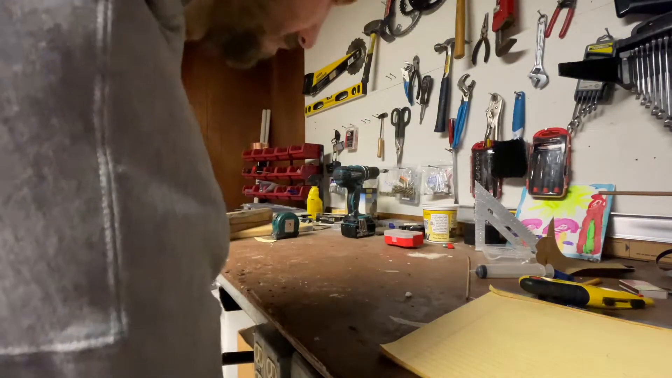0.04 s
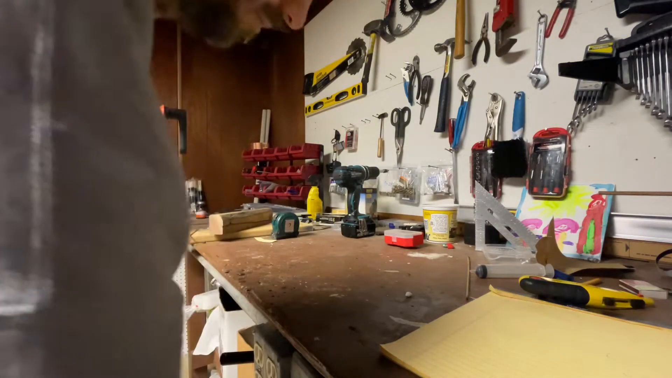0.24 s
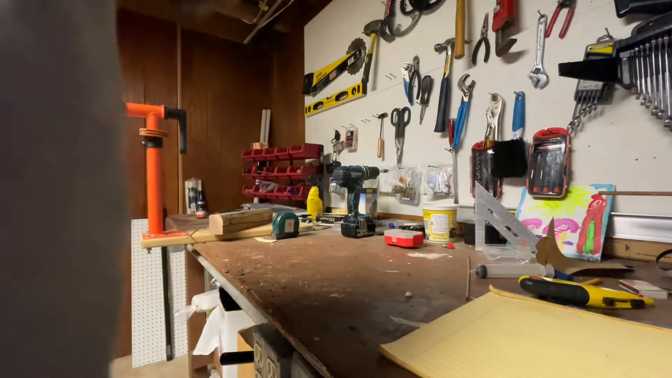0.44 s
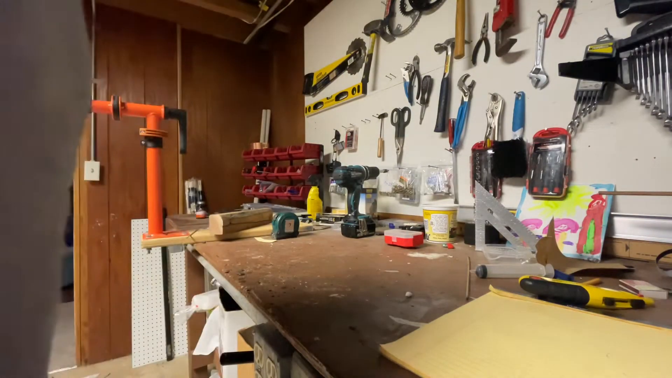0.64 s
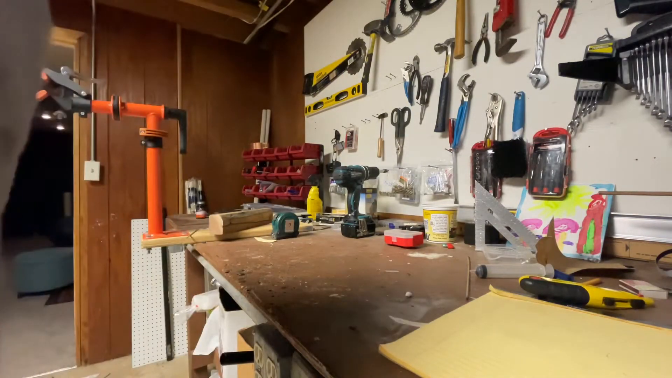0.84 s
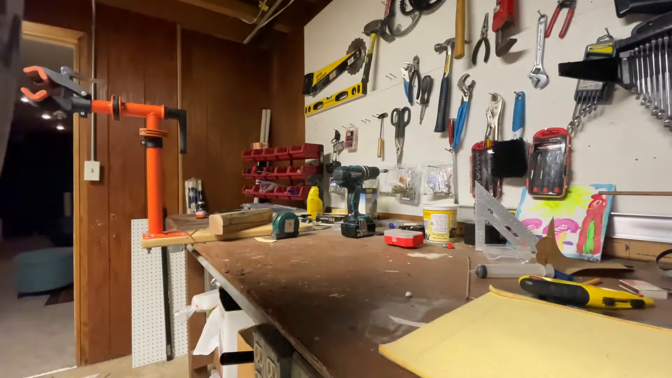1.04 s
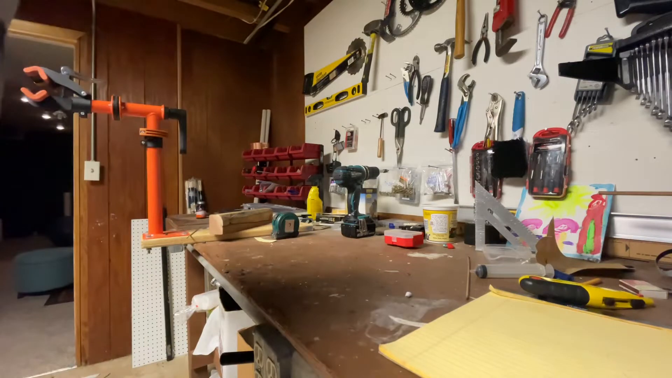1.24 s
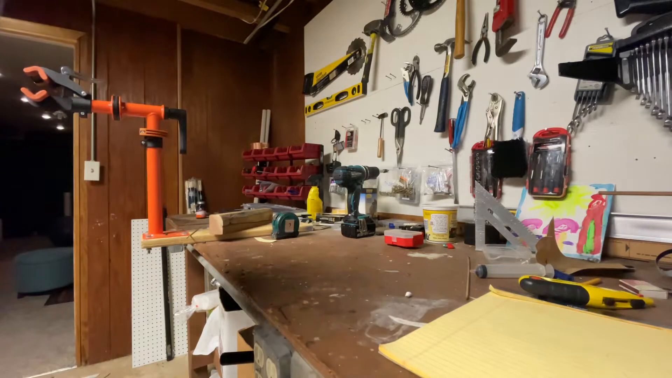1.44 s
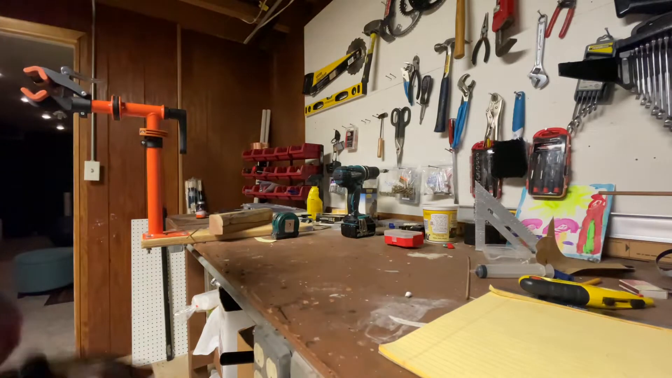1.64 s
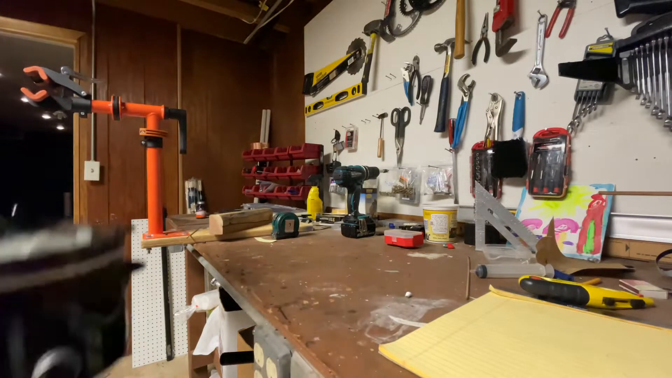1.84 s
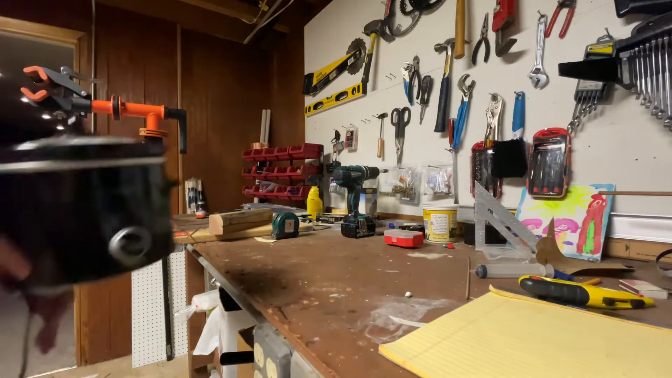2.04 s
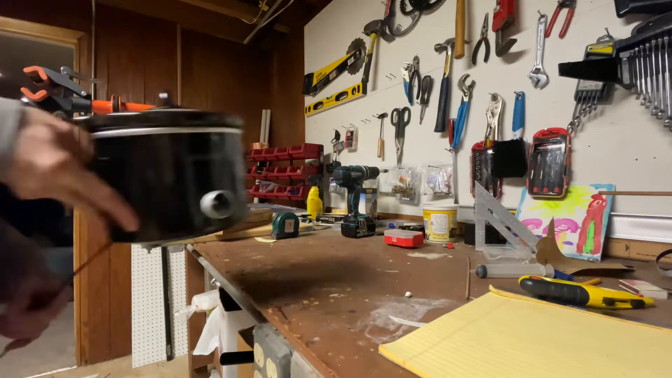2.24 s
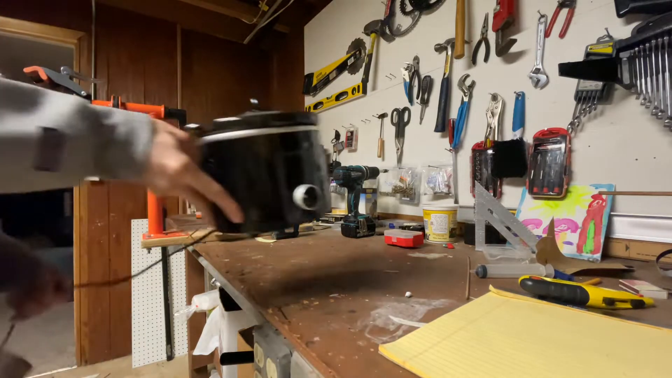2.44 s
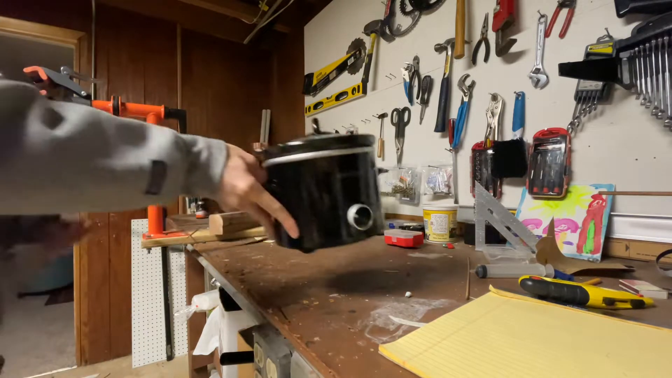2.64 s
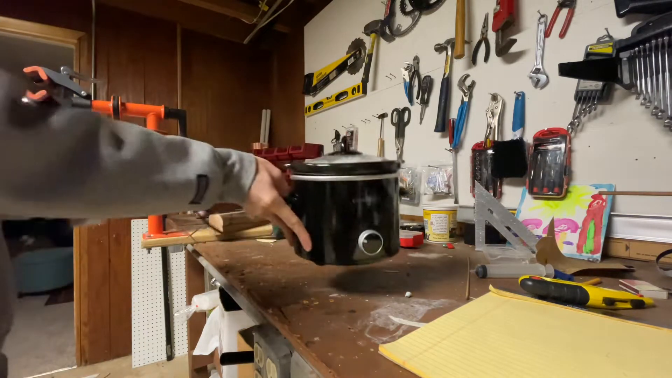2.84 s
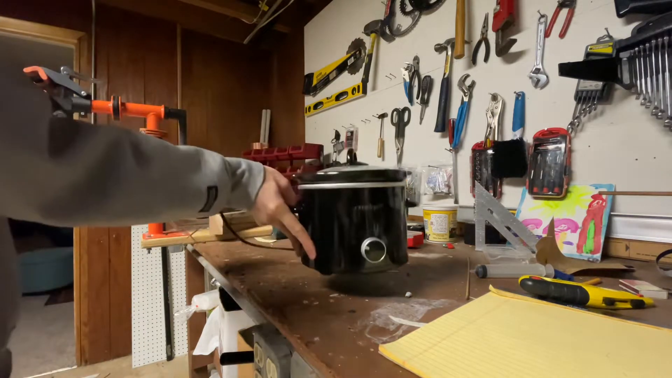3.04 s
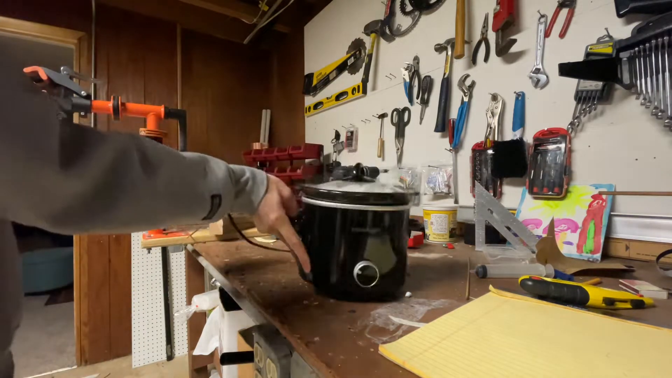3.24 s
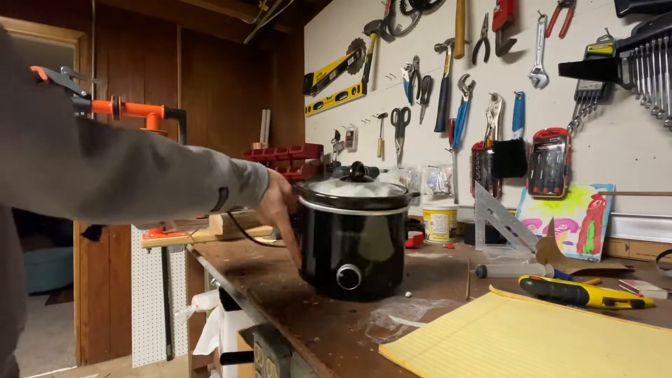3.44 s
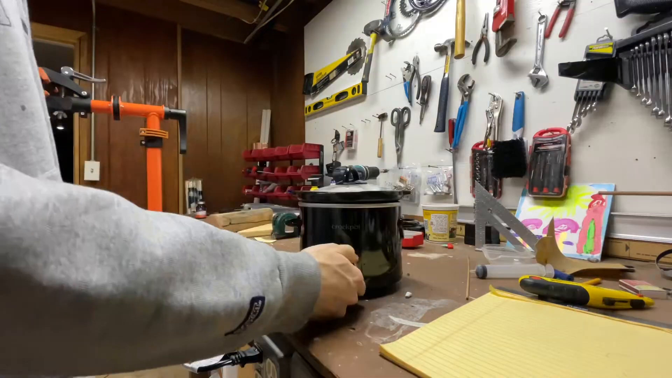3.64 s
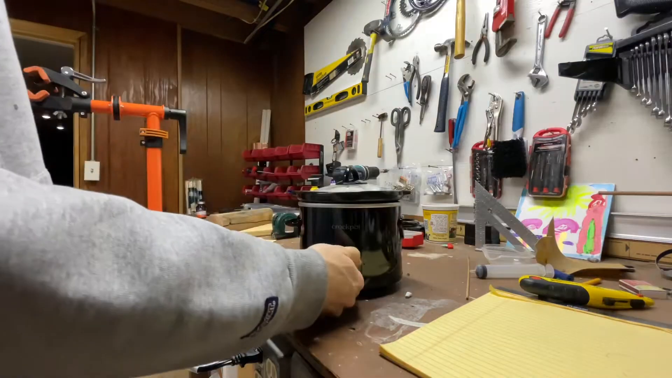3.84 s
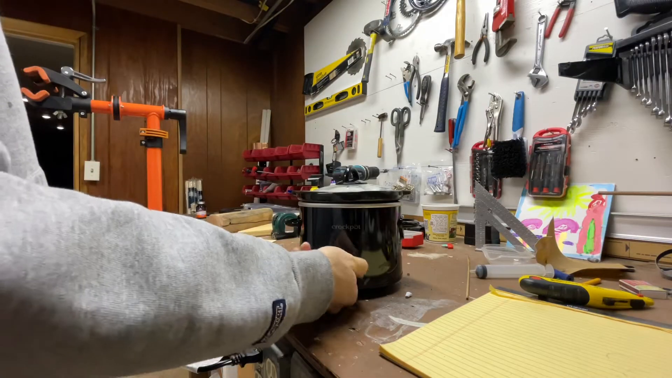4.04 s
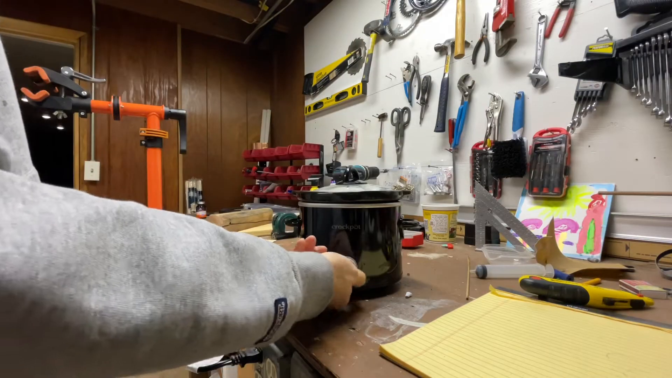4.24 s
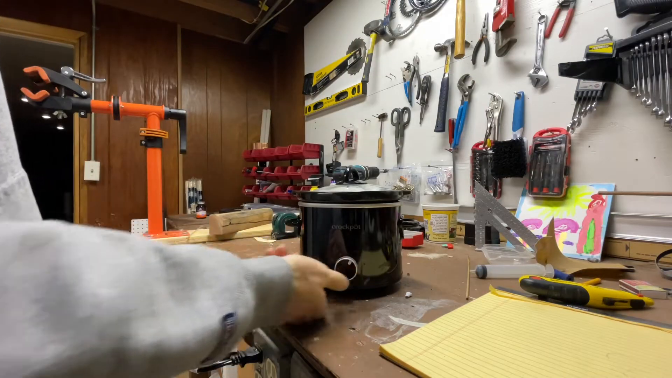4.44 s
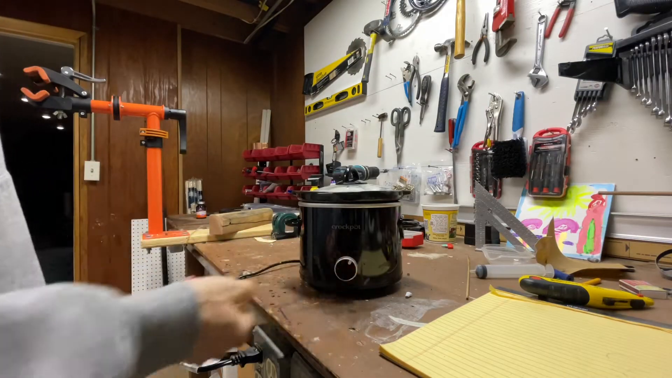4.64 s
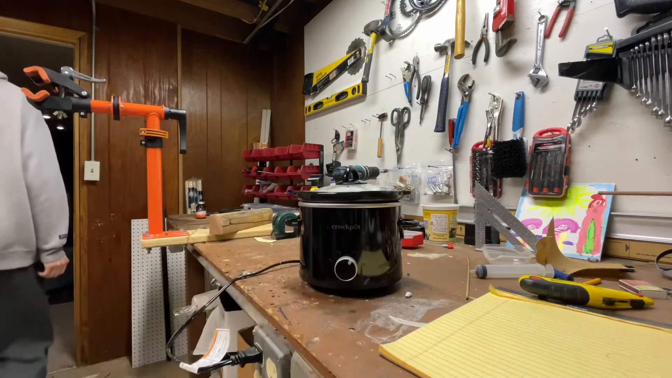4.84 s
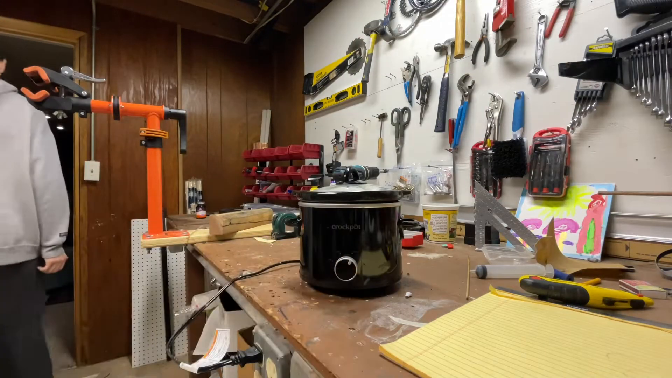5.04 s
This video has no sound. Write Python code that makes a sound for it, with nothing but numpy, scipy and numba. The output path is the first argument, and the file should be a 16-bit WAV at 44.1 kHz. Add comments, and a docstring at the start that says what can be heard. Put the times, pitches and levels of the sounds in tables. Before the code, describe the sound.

Light knocks and sleeve rustle, then a small cooker lands heavily on a wooden bench, followed by a sharp knob click.

```python
"""A workshop on a stereo microphone, a low room rumble throughout. In the first second a small slow
cooker knocks and clinks as it is lifted off a shelf; sleeves and cord rustle as it is carried in.
At 3.2 s its feet land one after another on a wooden workbench: the bench heaves, the lid rattles,
the pot judders to rest. The level dips briefly, the knob clicks round at 3.7 s, and a few ticks
and rubs follow, with a second dip at 4.7 s."""
import sys
import numpy as np
from scipy import signal
from scipy.fft import rfft, irfft, next_fast_len
from scipy.io import wavfile
from scipy.ndimage import uniform_filter1d
from numba import njit

SR = 44100
rng = np.random.default_rng(int(sys.argv[2]) if len(sys.argv) > 2 else 0)


def log_audio(samples):
    """Write samples as a 16-bit WAV file to the path given in sys.argv[1]."""
    # one column per channel
    frames = np.atleast_2d(samples).T
    # limit to full scale, then quantise
    limited = np.clip(frames, -1, 1)
    pcm = np.round(limited * 32767).astype(np.int16)
    wavfile.write(sys.argv[1], SR, pcm)


N = 225116

# how alike the room sounds on the two sides of the microphone: f/Hz, correlation
ROOM_LIKENESS = [(60, 0.77), (130, 0.69), (290, 0.49), (640, 0.017), (15000, 0.037)]


def feet_landing():
    """The feet hit the bench one after another and ring the pot."""
    # landings: t/s, level/dB, contact/ms, crack/dB, left minus right/dB, spot/quarter turns
    landings = [(3.2265, -23.5, 0.43, -23, 0, .2), (3.229, -11.5, 0.43, -29.5, 0, .1),
                (3.236, -17, 0.5, -24.5, 0.5, 0.75), (3.281, -16, 0.38, -26, -8, 1),
                (3.312, -27, 1., -29, -0.5, 0.71), (3.3405, -15.5, 0.5, -27, -2, 0.087),
                (3.365, -25, 0.53, -19, -4.5, 0.73)]
    # pot modes: f/Hz, level/dB, t60/s, left minus right/dB, antinode/quarter turns
    pot_modes = [(197, -3.5, 0.15, 0.72, 0.83), (285.4, -1.5, 0.084, 0.99, 0.12),
                 (352, -0.5, 0.064, 0.9, 1), (478, -1, 0.057, 0.89, 1), (575, 4.5, 0.055, 0.93, 0.048),
                 (670, -6, 0.045, 0.96, 1), (707, -9.5, 0.064, 1, 0.21), (929, -3.5, 0.049, 0.87, .1),
                 (1181, -8, 0.064, 0.86, 0.22), (1364, -11, 0.047, 0.81, 0.456),
                 (1663, -13, 0.024, 0.93, 0.78)]
    return strike(landings, pot_modes, crack_hz=(200, 2630), crack_t60=.15,
                  chatter_ms=4.6, spread=0.023, uneven=0.92)


def bench_heaving():
    """The wood booms under the load; the pot settles in four soft, even pushes, each a little weaker."""
    # heaves: t/s, level/dB, contact/ms, crack/dB, left minus right/dB
    heaves = [(.07, -40.5, 2.2, -12, 2), (.19, -34, 4, -35, -6), (.214, -32.5, 2.8, -32.5, -2),
              (.77, -35, 4.3, -38, -7), (3.2358, -12, 3, -17.5, -10), (3.2505, -17, 3.9, -29.5, -2.5),
              (3.288, -17.5, 0.88, -29, -7), (3.306, -23, 1.9, -23, -5), (3.347, -15.5, 8.5, -21.5, -10),
              (3.3635, -19.5, 5.2, -20, -1.5)]
    # bench modes: f/Hz, level/dB, t60/s, left minus right/dB
    bench_modes = [(68, 7, 0.092, 1), (126.4, 5, 0.12, 1), (180.5, 1.5, 0.13, 0.93), (247, -6, 0.072, 0.89)]
    judder_s, judder_hz = 3.433, 63.4
    judder = [(judder_s + k / judder_hz, -30 - 2 * k, 9.4, -28, -1.8) for k in range(4)]
    return strike(heaves + judder, bench_modes, crack_hz=(100, 400), crack_t60=0.17,
                  chatter_ms=0.84, spread=0.0051, uneven=0.203)


def lid_rattling():
    """The jolted lid taps the pot: hard contacts, a short bright ring."""
    # taps: t/s, level/dB, contact/ms, crack/dB, left minus right/dB
    taps = [(3.2325, -32, 0.091, 3, -1.5), (3.2412, -32.5, 0.095, 3.3, 1.9), (3.2748, -35.5, 0.061, 3, 1.5),
            (3.344, -38, 0.0783, 3, 1.0), (3.3575, -39, 0.08, 3, -0.5), (3.3768, -25.5, 0.11, 0.98, 1.4),
            (3.3815, -29, 0.13, 2, 1.5), (3.3875, -40, .1, 2, 1.5)]
    # lid modes: f/Hz, level/dB, t60/s, left minus right/dB
    lid_modes = [(2240, -7, 0.017, 0.0031), (3130, 2, 0.013, 0), (3950, 0, 0.021, 0.0073),
                 (4880, -1.5, 0.0058, 0.004), (6730, 6, 0.0075, 0), (7200, 0, 0.011, 0.0079)]
    return strike(taps, lid_modes, crack_hz=(1200, 7300), crack_t60=0.036,
                  chatter_ms=1.4, spread=0.15, uneven=0.68)


def shelf_knocking():
    """The cooker bumps the shelf on its way off and metal clinks, mostly left of the microphone."""
    # blows: t/s, level/dB, contact/ms, crack/dB, left minus right/dB, spot/quarter turns
    knocks = [(.167, -31, 0.39, -44, -0.5, 0.16), (.176, -31.5, 1.7, -29, 6, 0.13),
              (.197, -34.5, 0.62, -11, 9, 0.091), (.22, -37, 0.82, -13, 7, .2),
              (.719, -35, 0.43, -13.5, 9, 0.98), (.722, -26.5, 1.8, -41, -8, 0.95),
              (.738, -30, 1.45, -25, 6, 0.43), (.787, -41.5, 0.42, -10, 7, 0.93),
              (.815, -44, 0.42, -7, 16, 1), (.868, -48, 0.25, -15, 11, 0.44),
              (.897, -32, 0.38, -13, 12.5, 0.29), (.902, -23.5, 0.31, -14.5, 3.5, 0.72),
              (.987, -34.5, 1.15, -28, 4, 0.83), (.997, -33.5, 1.3, -25, 2, 0.83)]
    clinks = [(0.7189, -47, 0.058, -5, 9.5, 0.37), (0.7867, -38.5, 0.035, -2, 7.3, 0.87),
              (0.8126, -49, 0.05, 1, 6.9, .6), (0.8957, -36, 0.026, -4, 9.1, .2),
              (0.9025, -38.5, 0.03, -5, 8.2, .3), (0.972, -45, 0.062, -2, 6.5, .5)]
    # modes: f/Hz, level/dB, t60/s, left minus right/dB, antinode/quarter turns
    shelf_modes = [(189, -3.5, 0.045, -0.5, 0.11), (251.5, -0.5, 0.096, -4.5, 0.9),
                   (299, -2.5, 0.092, 4.5, 1), (348, -0.5, 0.13, -4, 0.2), (477, -1.5, 0.071, -2.5, 1),
                   (621, -7, 0.079, 5.5, 0.48), (731, -7.5, 0.067, 13, 0.97), (954, -5.5, 0.028, 4, 0.55),
                   (1160, -4.5, 0.2, -2, 0.049), (1374, 2.5, 0.05, 4.5, 1), (1930, -2.5, 0.021, 4, 0.52),
                   (2480, -3.5, 0.031, 3, 1)]
    metal_modes = [(2610, -3, 0.03, 0, .3), (3330, -1, 0.027, 0, .6), (6160, 2, 0.09, 0, .1),
                   (7450, -3, 0.05, 0, .8), (10060, -0.5, 0.07, 0, 0.85)]
    shelf = strike(knocks, shelf_modes, crack_hz=(430, 5100), crack_t60=0.062,
                   chatter_ms=3.07, spread=0.028, uneven=0.78)
    metal = strike(clinks, metal_modes, crack_hz=(870, 12000), crack_t60=0.048,
                   chatter_ms=3.0, spread=0.0049, uneven=0.49)
    return shelf + metal


def knob_turning():
    """The knob snaps round in one tight cluster of ringing clicks."""
    # clicks: t/s, level/dB, contact/ms, crack/dB, left minus right/dB, spot/quarter turns
    clicks = [(3.7245, -42, 0.084, 0, 1, 0.107), (3.7295, -41.5, 0.64, -24.5, 1, .5),
              (3.7385, -30.5, 0.18, -13, 2.2, 0.046), (3.7402, -25, 0.14, -14, 1.8, 0.046),
              (3.747, -30.5, 0.77, -9, 1, 0.6), (3.754, -32, 0.51, -29, 1, 1)]
    # knob modes: f/Hz, level/dB, t60/s, left minus right/dB, antinode/quarter turns
    knob_modes = [(553, 1, 0.059, 1, 0.99), (749, 0.5, 0.2, 1, 0.37), (1006, -5, 0.076, 1, 0.94),
                  (1386, -0.5, 0.04, 1, 0.13), (1657, 1, 0.05, 1, .2), (2376, 2, 0.12, 1, .05),
                  (2630, 9.5, 0.018, 1, .05), (3060, -2, 0.025, 1, .1), (4450, 1, 0.057, 1, .1),
                  (6050, -1.5, 0.012, 1, .1)]
    return strike(clicks, knob_modes, crack_hz=(670, 4540), crack_t60=0.076,
                  chatter_ms=1.0, spread=0.011, uneven=0.78)


def small_ticks():
    """Faint, hard contacts that ring near 3 kHz."""
    # ticks: t/s, level/dB, contact/ms, crack/dB, left minus right/dB
    ticks = [(2.111, -61, 0.06, -5, 11), (2.675, -54.5, 0.073, -6, 8), (3.921, -51.5, 0.055, -13, 1),
             (3.9955, -41, 0.05, -19.5, 3), (4.09, -51, 0.06, -10, 3)]
    # modes: f/Hz, level/dB, t60/s, left minus right/dB
    tick_modes = [(2390, -10, .015, 1), (3096, 7, 0.031, 1), (3780, -6, 0.02, 1), (4480, -8, 0.022, 1)]
    return strike(ticks, tick_modes, crack_hz=(1800, 7200), crack_t60=0.061,
                  chatter_ms=0.51, spread=0.037, uneven=0.44)


def strike(blows, modes, crack_hz, crack_t60, chatter_ms, spread, uneven):
    """Each blow is a short chatter of half-sine pushes into the modes, with a crack of contact noise."""
    hz, db, t60, lean_db, *antinode = (column[:, None] for column in np.transpose(modes))
    out = np.zeros((2, N + SR))
    t = np.arange(int(SR * max(t60.max(), crack_t60) * 3 / 4)) / SR
    sign = -(-1.) ** np.arange(len(modes))  # neighbouring modes swing against each other
    side = np.array([[.5], [-.5]])
    chatter_fade = np.exp(-np.arange(1000) * 1000 / SR / chatter_ms)
    for s, level_db, contact_ms, crack_db, pan_db, *spot in blows:
        # an uneven body splits each mode into close partials that reach the two sides unequally
        split = 1 + spread * rng.standard_normal((4, len(modes), 1))
        ring = np.sin(2 * np.pi * hz * split * t) * np.exp(-np.log(1000) * t / t60)
        scatter = 1 + uneven * rng.standard_normal((4, 2, len(modes)))
        reach = scatter * sign * undb(db.T + side * lean_db.T)
        if spot:  # a mode struck near its node stays quiet
            reach *= 0.15 + np.abs(np.cos(np.pi / 2 * (spot[0] - antinode[0].T)))
        length = max(contact_ms * SR / 1000, 1.01)
        push = np.sin(np.pi * (np.arange(int(length) + 1) + .5).clip(0, length) / length)
        chatter = (rng.random(1000) < .04) * rng.random(1000) * chatter_fade
        chatter[0] = 1.24  # the first touch is the hardest
        force = np.convolve(push, chatter)
        body = signal.fftconvolve((reach @ ring).sum(axis=0), force[None])[:, :len(t)]
        noise = rng.standard_normal((3, len(t)))
        crack = band(noise[0] + 2.5 * noise[1:], *crack_hz) * np.clip(t / 0.00061, 0, 1)
        crack = crack / np.std(crack) * np.exp(-np.log(1000) * t / crack_t60)
        hit = body / np.abs(body).max(axis=1).mean() + undb(crack_db) * crack
        i = int(s * SR)
        out[:, i:i + len(t)] += hit * undb(level_db + side * pan_db) / np.hypot(1, 2 * undb(crack_db))
    return out[:, :N]


def rustle():
    """Swells of grainy noise, dull, bright and hollow; most are the rustle of sleeves and cord."""
    # swells: t/s, rise/s per 20 dB, hold/s, fade/s per 20 dB, level/dB, bright half/dB,
    # hollow band/dB, its f/Hz, its width/Hz, left minus right/dB
    # at 3.219 s: a brief, soft swell of noise near 1.2 kHz just before the first foot lands
    swells = [(0.091, 0.03, 0.055, -0.02, -73.5, -5.5, 10, 1170, 1180, 1.5),
              (0.204, 0.06, 0.016, 0.06, -55, -7.5, 4.5, 1150, 790, 5),
              (.74, 0.03, .03, 0.06, -64.5, 0, -2, 1300, 990, 3),
              (0.813, -0.0061, 0.0037, 0.07, -57, -10, 2.5, 1320, 250, 3),
              (0.854, -0.03, 0.055, 0.39, -62, -5, 3.5, 1270, 990, 4),
              (0.962, 0.08, 0.035, 0.14, -56, -1.5, -2, 2092, 1000, 3.5),
              (1.021, -0.04, 0.18, 0.01, -71, -15.5, 8.5, 1950, 725, 0),
              (2.041, 0.06, 0.024, 0.08, -75, 1, -6, 1105, 990, 3),
              (2.118, 0.07, 0.056, 0.18, -68.5, -6.5, 5, 1120, 347, 4),
              (2.161, 0.02, 0.016, 0.06, -68.5, -8, -5, 3400, 1490, 2),
              (2.218, 0.03, 0.016, 0.05, -70, -0.5, -6, 3400, 1500, 3),
              (2.27, 0.1, 0.027, 0.26, -78, 4.5, -3, 1110, 990, 4),
              (2.373, 0, 0.015, 0.36, -83, 3, -5, 1110, 990, 2),
              (2.544, -0.06, 0.039, 0.33, -72.5, -1, 0, 1030, 990, 4),
              (2.673, -0.06, 0.015, 0.05, -70, -5, 0, 2900, 1500, 2),
              (2.884, 0.25, 0.064, 0.3, -77, -4.5, -5, 1120, 990, 5),
              (3.105, 0.44, 0.11, 0.3, -87, -16, 1.5, 3680, 700, 6),
              (3.219, -0.04, .012, 0.03, -74, -19, 22.5, 1200, 700, -1),
              (3.226, -0.0059, 0.12, 0.1356, -51, -7, 1, 1390, 990, 2),
              (3.7, 0.08, 0.035, 0.3, -71.5, -20, -5.5, 1090, 990, 2.5),
              (3.877, 0.035, 0.017, 0.07, -57.5, -11.5, 0, 1110, 990, 3),
              (3.869, -0.06, 0.028, -0.02, -69, -7, 3.5, 3170, 700, -1),
              (3.999, -0.01, 0.01, 0.12, -67, -6, 5.5, 1100, 990, 0),
              (4.07, 0.08, 0.016, 0.1048, -61, -11, -0.5, 1060, 990, 1.44),
              (4.065, -0.05, 0.03, -0.01, -74, -7, 7, 3060, 600, 0),
              (4.219, -0.3, 0.014, 0.06, -76.5, -5.5, -3, 3200, 600, 0.5),
              (4.24, -0.1, 0.027, 0.15, -87, -3, 3.5, 4700, 400, 4),
              (4.502, 0.13, 0.16, 0.5, -83.5, 5.5, -0.5, 1120, 980, 7.5),
              (4.695, 0.06, 0.029, 0.14, -68, -14, -3.5, 1800, 1000, 1.5)]
    # cloth spectrum: f/Hz, level/dB
    cloth_spectrum = [(1060, -30), (1800, -1.5), (3410, -3.5), (5130, -5.5), (9290, -16.5), (12600, -25.5),
                      (13400, -30), (14200, -62), (15000, -52)]
    t = np.arange(N) / SR
    fibres = rng.standard_normal((3, N)) * undb(2.33 * rng.exponential(size=(3, N)) + 6.5 * walk(45))
    grains = fibres[1:] + 0.65 * fibres[0]  # one part reaches both sides alike
    cloth = coloured(grains, cloth_spectrum)
    dull, bright = (v / np.std(v) for v in (band(cloth, 1960, 7100), band(cloth, 7860, 14800)))
    out = np.zeros((2, N))
    for s, rise, hold, fade, db, bright_db, hollow_db, hz, width, pan_db in swells:
        shape_db = -20 * ((s - t).clip(0) / abs(rise) + (t - s - hold).clip(0) / abs(fade))
        on = shape_db > -50
        hollow = np.array([resonate(resonate(g[on], hz, width), hz, width) for g in grains])
        mix = dull[:, on] + undb(bright_db) * bright[:, on] + undb(hollow_db) * hollow / np.std(hollow)
        out[:, on] += undb(db + shape_db[on] + np.array([[pan_db], [-pan_db]]) / 2) * mix
    return out


def workshop_echo(dry):
    """Diffuse echo off the walls: octaves of noise, each fading at its own rate, wide above the bass."""
    # room decay: f/Hz, t60/s
    decay = [(100, 0.25), (400, 0.39), (1500, 0.31), (5000, 0.37), (12000, 0.15)]
    # echo against direct sound: f/Hz, level/dB
    echo_levels = [(100, -1), (400, -6.5), (1500, 2), (5000, -7), (9000, -1), (13000, 4)]
    t, tail = np.arange(SR // 2) / SR, 0
    for hz in 60 * 2. ** np.arange(8):
        fade = np.exp(-np.log(1000) * t / on_log(decay, hz)) * np.clip(t / 0.012, 0, 1)
        alike = on_log(ROOM_LIKENESS, hz)
        common = np.sqrt(alike) * rng.standard_normal(len(t))
        apart = np.sqrt(1 - alike) * rng.standard_normal((2, len(t)))
        octave = band(common + apart, hz / np.sqrt(2), hz * np.sqrt(2)) * fade
        # scale to the energy that a unit click has in this octave
        share = np.sqrt(np.sqrt(2) * hz / SR / np.sum(octave ** 2, axis=1, keepdims=True))
        tail = tail + octave * share * undb(on_log(echo_levels, hz))
    return signal.fftconvolve(dry.mean(axis=0, keepdims=True), tail, axes=1)[:, :N]


def drone():
    """Narrow low noise that swells and sinks, dead centre."""
    low = band(rng.standard_normal(N), 100, 190)
    return low / np.std(low) * undb(-64.5 + 10.5 * walk(3.52))


def room_rumble():
    """Building rumble and air hiss, swelling a little; the bass is much the same on both sides."""
    # room tone spectrum: f/Hz, level/dB
    room_tone = [(15, -38), (25, -7.5), (131, -2.5), (154, -18), (186, -13), (264, -14), (301, -13.5),
                 (326, -24), (363, -17.5), (573, -21.5), (879, -27), (1180, -40.5), (4150, -52),
                 (6370, -48), (15000, -61)]
    size = next_fast_len(N)
    alike = on_log(ROOM_LIKENESS, np.fft.rfftfreq(size, 1 / SR))
    mid, side = rfft(rng.standard_normal((2, size)))
    pair = irfft(np.sqrt(1 + alike) * mid + np.sqrt(1 - alike) * side * np.array([[1], [-1]]), size)
    return coloured(pair[:, :N], room_tone) * undb(-52.5 + 2.0 * walk(2.87))


def level_dips(x):
    """The level dips briefly twice and comes back a little lower each time."""
    # dips: t/s, depth/dB, fall/s, rise/s
    dips = [(3.529, -24.5, 0.027, 0.04), (4.694, -19, 0.039, 0.023)]
    # gain before, between and after the dips: level/dB
    steps_db = [-1.5, -2.5, -4.5]
    t = np.arange(N) / SR
    gain = undb(steps_db)[np.searchsorted([dip[0] for dip in dips], t)]
    for s, depth_db, fall_s, rise_s in dips:
        gain *= np.interp(t, [s - fall_s, s, s + rise_s], [1, undb(depth_db / 2), 1]) ** 2
    return x * gain


def undb(db):
    """Decibels to gain."""
    return 10 ** (np.asarray(db) / 20)


def on_log(table, hz):
    """Read a table of f/Hz, value on a log-frequency axis."""
    f, v = np.transpose(table)
    return np.interp(np.log(np.maximum(hz, 1)), np.log(f), v)


def coloured(x, table):
    """Shape x by a table of f/Hz, level/dB; rms 1."""
    size = next_fast_len(N)
    y = irfft(rfft(x, size) * undb(on_log(table, np.fft.rfftfreq(size, 1 / SR))), size)[..., :N]
    return y / np.std(y)


def band(x, lo_hz, hi_hz):
    """Gentle band-pass."""
    return signal.sosfilt(signal.butter(2, [lo_hz, hi_hz], "bandpass", fs=SR, output="sos"), x)


def walk(rate):
    """Random levels held 1 / rate s and smoothed twice."""
    k = int(SR / rate)
    held = np.repeat(rng.standard_normal(N // k + 1), k)
    return 0.45 * uniform_filter1d(uniform_filter1d(held, k), k)[:N]


@njit
def resonate(x, hz, width_hz):
    """State-variable band-pass, gain 1 at its centre."""
    y, mid, low = np.empty(len(x)), 0., 0.
    g, damping = np.tan(np.pi * hz / SR), width_hz / hz
    for i in range(len(x)):
        v = (mid + g * (x[i] - low)) / (1 + g * (g + damping))
        mid, low = 2 * v - mid, low + 2 * g * v
        y[i] = damping * v
    return y


def scene():
    """Blows and their echo over rustle, drone and rumble; the heave travels mostly through the bench."""
    blows = shelf_knocking() + feet_landing() + lid_rattling()
    knob = knob_turning()
    blows += small_ticks()
    heave = bench_heaving()
    echo = workshop_echo(blows + undb(-9.0) * heave + undb(-3.0) * knob)
    return blows + heave + knob + echo + rustle() + drone() + room_rumble()


def record(dry):
    """The level dips, then a microphone with ringing ports that loses the deepest bass and the top."""
    # port resonances: f/Hz, width/Hz, level/dB
    ports = [(6600, 2000, -8.5), (10100, 2300, -13.5)]
    dipped = level_dips(dry)
    mic = dipped + sum(undb(db) * band(dipped, hz - width / 2, hz + width / 2) for hz, width, db in ports)
    mic = signal.sosfilt(signal.butter(6, 37, "highpass", fs=SR, output="sos"), mic)
    dulled = signal.sosfilt(signal.butter(12, 13300, fs=SR, output="sos"), mic)
    return signal.sosfilt(signal.ellip(8, .2, 70, 15800, fs=SR, output="sos"), dulled)


dry = scene()
out = record(dry)
log_audio(out)
```